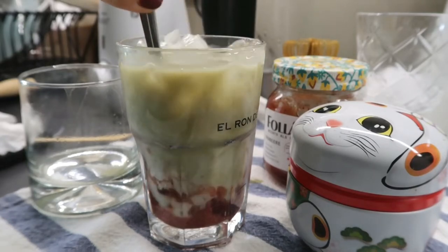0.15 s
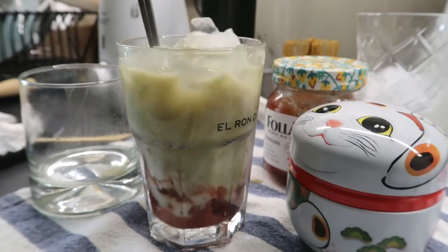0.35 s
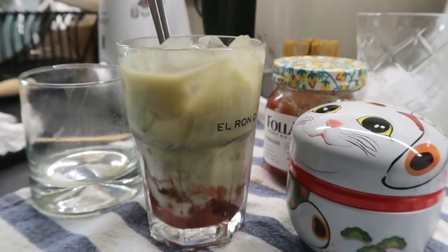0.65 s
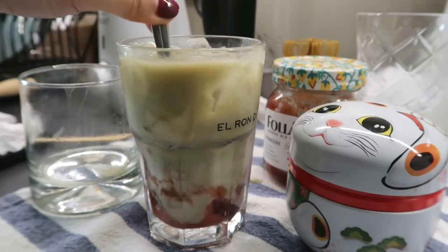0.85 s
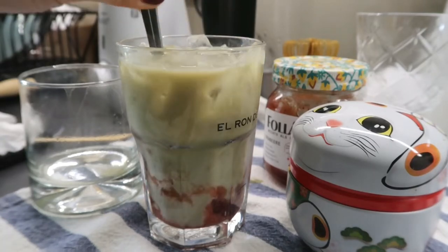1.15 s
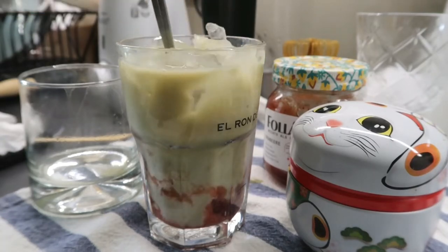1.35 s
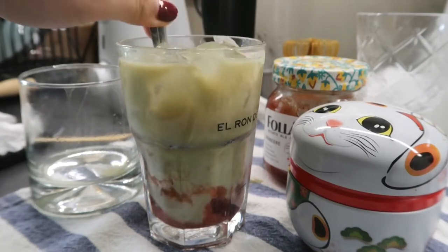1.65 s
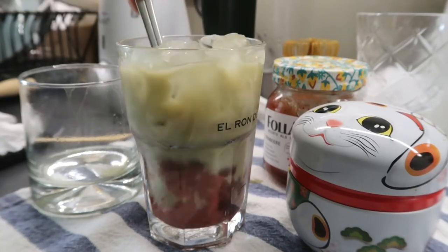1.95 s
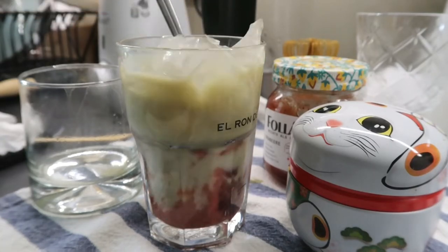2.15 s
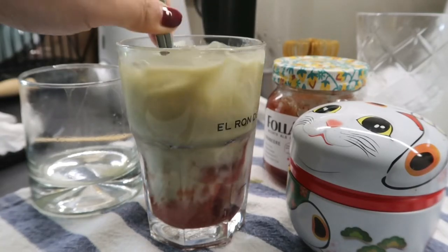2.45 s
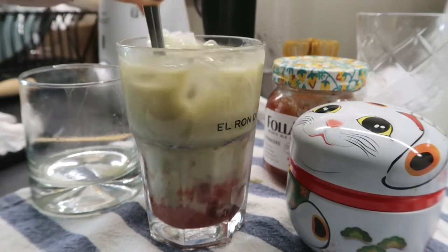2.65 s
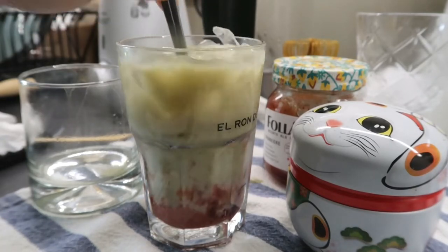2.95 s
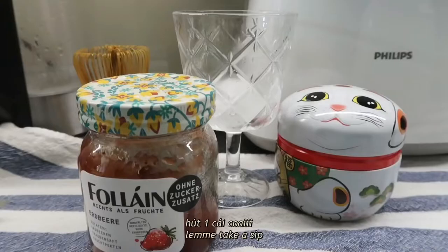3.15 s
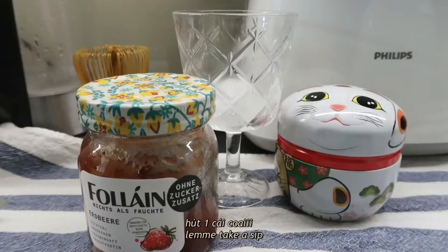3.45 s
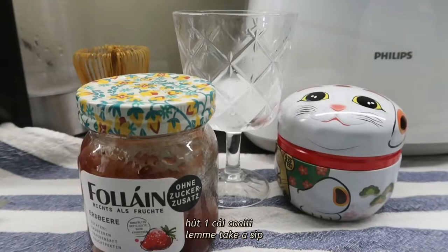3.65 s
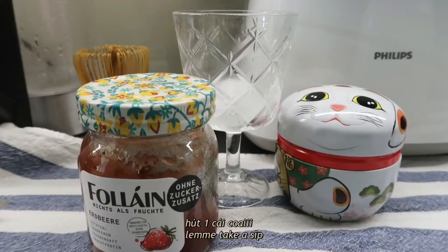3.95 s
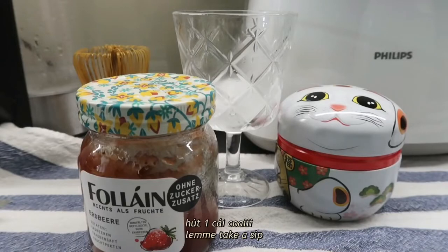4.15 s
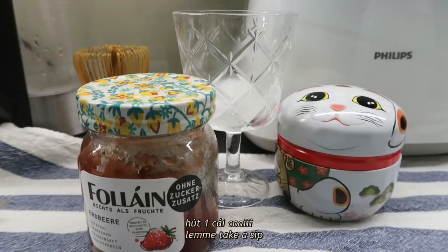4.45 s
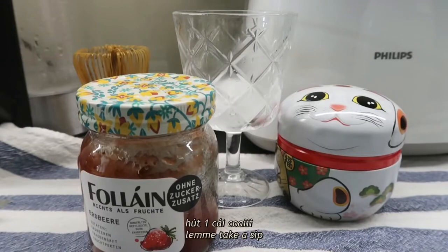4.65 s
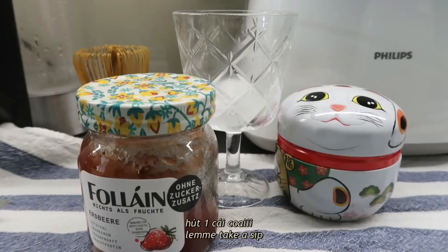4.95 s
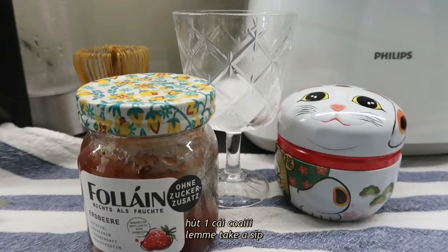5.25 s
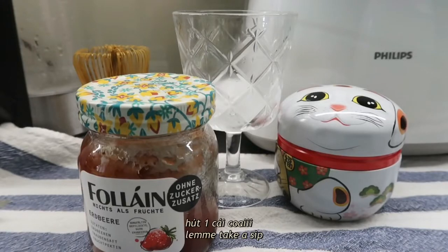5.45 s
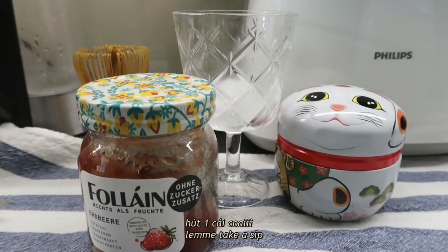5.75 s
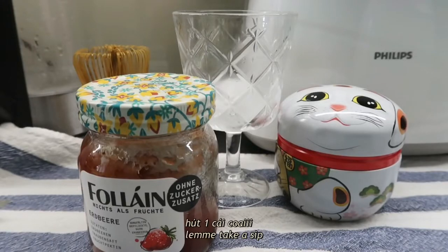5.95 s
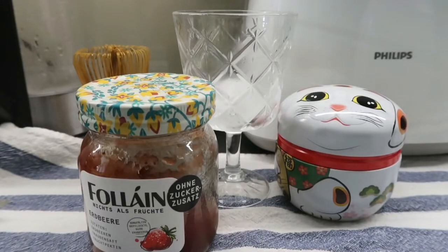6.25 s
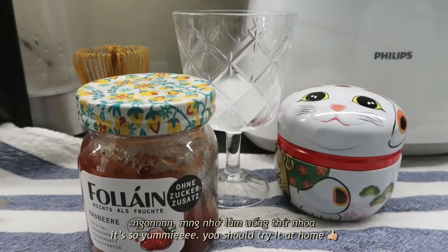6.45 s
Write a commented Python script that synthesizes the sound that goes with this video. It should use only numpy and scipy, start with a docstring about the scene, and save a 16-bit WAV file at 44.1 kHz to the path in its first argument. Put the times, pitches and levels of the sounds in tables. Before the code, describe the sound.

In a small, lightly echoing kitchen with low appliance rumble, ice and a metal straw tap a liquid-filled glass, damped and uneven, with faint slosh and bubbly blips. After an abrupt change the glass is tilted close to the microphone: a dense burst of hard, ringing ice clatter, then a lull, a brief bright hiss, a wet gulp, a single heavy clack and small trailing taps.

```python
"""Quiet kitchen: a metal straw stirs ice in a full tumbler of milky drink on a cloth; then, after a cut,
the glass is held and tilted for a sip. Knocks and fine rattle excite decaying glass and ice modes; ticks,
gurgles and other single tones are short rings; slosh, grinding, a hiss and a squelch are shaped noise.
Room tone and hum lie behind, diffuse echoes around. Two microphone ports; gain control ducks after loud knocks."""
import sys
import numpy as np
from scipy import signal
from scipy.io import wavfile
from scipy.ndimage import uniform_filter1d

SR = 44100
rng = np.random.default_rng(int(sys.argv[2]) if len(sys.argv) > 2 else 0)


def digitize_waveform(pressure):
    """Quantize a signal to 16-bit integers and store it at the path in sys.argv[1].

    Rows of a 2-D input are taken as channels; values are limited to [-1, 1].
    """
    field = np.atleast_2d(pressure).T
    bounded = np.clip(field, -1, 1)
    quanta = np.round(bounded * 32767).astype(np.int16)
    wavfile.write(sys.argv[1], SR, quanta)


N = 291501
TIME = np.arange(N) / SR
CUT_S, DRAINED_S = 3.02, 4.2   # cut from standing to held glass; drink leaves the wall
LEFT_RIGHT = np.array([[1], [-1]])


def amp(db):
    """Decibels to gain."""
    return 10 ** (np.asarray(db) / 20)


def rms_one(x):
    """Scale to rms 1."""
    return x / np.sqrt(np.mean(x ** 2) + 1e-20)


def in_time(rows):
    """Columns of a curve table, one value a sample."""
    s, *columns = np.transpose(rows)
    return [np.interp(TIME, s, c) for c in columns]


def at_hz(points, hz):
    """A spectrum read on a log-frequency axis."""
    points = np.array(points)
    return np.interp(np.log(hz), np.log(points[:, 0] + 1), points[:, 1])


def drift(rate_hz):
    """Slow chance, spread 1: low-passed noise at SR / 40, interpolated."""
    r = np.exp(-80 * np.pi * rate_hz / SR)
    noise = rng.standard_normal(N // 40 + 2002)
    slow = signal.lfilter([1], [1, -2 * r, r * r], noise)[2000:]
    return np.interp(np.arange(N) / 40, np.arange(len(slow)), rms_one(slow))


def banded_noise(spectrum, likeness, patchy_db, grain_db=0):
    """Half-octave bands of stereo noise, each with its own level, flicker, grain and likeness; rms 1."""
    out, together = 0, drift(8.0)
    edges_hz = 20 * 2 ** np.arange(0, 10, .5)
    white = rng.standard_normal((2, 2, N))
    for k, (low, high) in enumerate(zip(edges_hz, np.r_[edges_hz[1:], .4 * SR])):
        band = signal.butter(2, [low, high], "band", fs=SR, output="sos")
        mid, side = signal.sosfilt(band, white[k % 2])
        hz = np.sqrt(low * high)
        alike = np.clip(at_hz(likeness, hz), -1, 1)
        flicker_db = patchy_db * (together + drift(18)) + grain_db * drift(72.0)
        stereo = np.sqrt(1 + alike) * mid + np.sqrt(1 - alike) * side * LEFT_RIGHT
        out = out + amp(at_hz(spectrum, hz) + flicker_db) * stereo
    return rms_one(out)


def ring(clicks, hz, pitch, t60, lead, contact_s):
    """Clicks set one decaying mode ringing after a soft contact; pitch may slide, left leads in phase."""
    turn = np.exp(2j * np.pi * hz * np.cumsum(pitch) / SR)
    soft = np.exp(-1 / (max(contact_s, 1e-4) * SR))
    poles = np.convolve([1, -amp(-60 / (t60 * SR))], [1, -soft])
    swing = signal.lfilter([1 - soft], poles, clicks / turn + 1e-18) * turn
    return np.imag(swing * np.exp(.5j * lead * LEFT_RIGHT))


# phase lead of the left port: f/Hz, lead/rad (scaled down below 4 kHz)
LEAD_STANDING = [(0, -2), (3880, 0.28), (5680, 2), (6630, -1.2), (10400, 4), (12700, 1), (15400, -18)]
LEAD_HELD = [(0, -4), (4130, 0.26), (4480, -0.7), (5430, -1.5), (7320, 4.5), (7840, -2.5), (8700, 7),
             (11700, -2.5), (15400, -5)]


def port_lead(lead, hz):
    """Phase lead of the left port, rad; long waves reach both ports in step."""
    return at_hz(lead, hz) * min(hz / 4000, 1)


def blips(rows, attack_s):
    """Short single decaying rings with gliding pitch: rows (t/s, level/dB, f/Hz, glide factor, cycles)."""
    out, t = np.zeros((2, N + SR)), np.arange(SR // 10) / SR
    for s, peak_db, hz, rise, cycles in rows:
        t60 = max(cycles, 2) / hz
        glide_hz = hz * (1 + (rise - 1) * np.minimum(t / (.5 * t60), 1))
        envelope = amp(peak_db - 60 * t / t60) * np.minimum(t / attack_s, 1)
        lead = port_lead(LEAD_STANDING if s < CUT_S else LEAD_HELD, hz)
        phase = 2 * np.pi * np.cumsum(glide_hz) / SR + lead / 2 * LEFT_RIGHT
        out[:, int(s * SR):][:, :len(t)] += envelope * np.sin(phase)
    return out[:, :N] * amp(2.5 * drift(150.0))   # the rings flutter in level


# appliance rumble: f/Hz, width/Hz, level/dB re room tone
HUM = [(66.9, 12, -9), (89.6, 15, -4)]


def hum():
    """Noise twice through each low resonance: a wavering rumble, alike at both ports."""
    out = 0
    for hz, width_hz, level_db in HUM:
        r, x = np.exp(-np.pi * width_hz / SR), rng.standard_normal(N + SR)
        for _ in range(2):
            x = signal.lfilter([1, 0, -1], [1, -2 * r * np.cos(2 * np.pi * hz / SR), r * r], x)
        out = out + amp(level_db) * rms_one(x[SR:])
    return out


# room spectrum: f/Hz, relative level/dB
ROOM_TONE = [(12, -40), (20, -10.5), (76, -5.5), (102, -10.5), (124, -10), (225, -18.5), (295, -12.5),
             (495, -22), (552, -21), (1210, -25.5), (1470, -27.5), (1680, -27), (4480, -40), (12000, -49.5),
             (16000, -73)]
# room stereo: f/Hz, left-right likeness (-1 to 1)
ROOM_LIKENESS = [(20, 1), (110, 1), (170, 0.4), (300, 0.16), (600, 0.11), (1650, 0.3), (5000, 0.2),
                 (13000, 0.0985)]
ROOM_STANDING_DB, ROOM_HELD_DB = -50, -48


def room(held):
    """Steady broadband noise plus hum, slightly higher after the cut."""
    level = amp(np.where(held, ROOM_HELD_DB, ROOM_STANDING_DB))
    return level * (banded_noise(ROOM_TONE, ROOM_LIKENESS, patchy_db=-0.7) + hum())


KITCHEN_T60_S, KITCHEN_DB = 0.3, -10.5   # t60 of the dull part


def kitchen(x):
    """Diffuse echoes; the treble dies sooner, and mainly short waves differ between the ports."""
    t = np.arange(SR // 2) / SR
    noise = rng.standard_normal((2, len(t)))
    dull = signal.lfilter([.45], [1, -.55], noise)
    bright = noise - dull
    mid, side = dull * amp(-60 * t / KITCHEN_T60_S) + bright * amp(-110 * t / KITCHEN_T60_S)
    side = 0.48 * signal.lfilter(*signal.butter(1, 900., "high", fs=SR), side)
    echoes = np.array([mid + side, mid - side]) * np.minimum(t / 0.0065, 1)
    echoes = echoes / np.sqrt(np.sum(echoes ** 2) / 2)
    return amp(KITCHEN_DB) * signal.fftconvolve(x[None], echoes, axes=1)[:, :N]


# drink spectrum: f/Hz, relative level/dB
SLOSH = [(60, -39), (120, -30), (250, 7), (600, 1.5), (1200, -16.5), (2500, -8), (6000, -24)]
# wet-noise stereo: f/Hz, left-right likeness (-1 to 1)
SLOSH_LIKENESS = [(100, -0.31), (500, 0.051), (3000, 1), (7000, -0.68), (12000, 0.58)]
SLOSH_STIRRED_DB, SLOSH_STIRRED_FOLLOWS = -57, 0.98   # at usual motion; dB per dB of motion
SLOSH_HELD_DB, SLOSH_HELD_FOLLOWS = -61.5, 0.41


def slosh(swing_db, held):
    """Grainy noise: the drink swirls with the straw, then only sways in the hand."""
    stirred_db = SLOSH_STIRRED_DB + SLOSH_STIRRED_FOLLOWS * swing_db
    held_db = SLOSH_HELD_DB + SLOSH_HELD_FOLLOWS * swing_db
    noise = banded_noise(SLOSH, SLOSH_LIKENESS, patchy_db=2.0, grain_db=4.0)
    return amp(np.where(held, held_db, stirred_db)) * noise


# hiss spectrum: f/Hz, relative level/dB
HISS_COLOUR = [(710, -44), (1200, -23), (2120, -18), (3130, -14), (4190, -5), (6230, -16), (7330, -5),
               (13000, -14), (15700, -30)]
HISS_S, HISS_DB, HISS_ATTACK_S, HISS_HOLD_S, HISS_FADE_DB_PER_S = 5.029, -46, 0.0049, 0.041, 429.5
HISS_FROM_HZ, HISS_TO_HZ, HISS_SINK_S = 4750, 1740, 0.016


def hiss():
    """A short burst of bright noise during the sip, one broad resonance falling through it."""
    t = np.maximum(TIME - HISS_S, 0)
    fade_db = HISS_FADE_DB_PER_S * np.maximum(t - HISS_ATTACK_S - HISS_HOLD_S, 0)
    envelope = np.minimum(t / HISS_ATTACK_S, 1) ** 2 * amp(HISS_DB - fade_db)
    sink = np.exp(-np.maximum(t - HISS_ATTACK_S, 0) / HISS_SINK_S)
    centre_hz = HISS_TO_HZ + (HISS_FROM_HZ - HISS_TO_HZ) * sink
    falling = ring(rng.standard_normal(N), 1.0, centre_hz, t60=0.0084, lead=0, contact_s=.0001)
    noise = banded_noise(HISS_COLOUR, SLOSH_LIKENESS, patchy_db=2.0, grain_db=1.0)
    return envelope * (noise + amp(-3.5) * rms_one(falling[1]))


SQUELCH_S, SQUELCH_DB, SQUELCH_HOLD_S, SQUELCH_FADE_DB_PER_S = 5.63, -39, 0.026, 400
SQUELCH_HZ, SQUELCH_T60_S = 2000, 0.012


def squelch():
    """Drink gulps between the cubes as the glass tips back: lumpy noise in one broad resonance."""
    t = np.maximum(TIME - SQUELCH_S, 0)
    fade_db = SQUELCH_FADE_DB_PER_S * np.maximum(t - SQUELCH_HOLD_S, 0)
    envelope = np.minimum(t / 0.003, 1) * amp(SQUELCH_DB - fade_db + 3.0 * drift(90.0))
    noise = rng.standard_normal(N)
    return envelope * rms_one(ring(noise, SQUELCH_HZ, np.ones(N), SQUELCH_T60_S, lead=0, contact_s=.0001))


GURGLES_PER_S, GURGLE_DB, GURGLE_RISE, GURGLE_CYCLES = 30, -49.5, 1.22, 13.3   # dB at usual motion
GURGLE_LOW_HZ, GURGLE_HIGH_HZ = 450, 1710


def gurgles(swing_db):
    """Small rising blips at random in the stirred drink, louder when the ice moves hard."""
    when, size, tone = rng.random((int(GURGLES_PER_S * CUT_S), 3)).T
    s = when * CUT_S
    level_db = GURGLE_DB + 0.37 * swing_db[(s * SR).astype(int)] + 10.0 * (size - .5)
    hz = GURGLE_LOW_HZ * (GURGLE_HIGH_HZ / GURGLE_LOW_HZ) ** tone
    return blips([(*row, GURGLE_RISE, GURGLE_CYCLES) for row in zip(s, level_db, hz)], attack_s=0.0031)


# single short rings: t/s, level/dB, f/Hz, glide factor, cycles to die away
SHORT_RINGS = [(0.141, -39, 236, 0.95, 42), (0.3835, -28, 3300, 1.1, 40), (0.392, -30, 3700, 1.15, 50),
               (0.4269, -19.5, 1870, 3, 61), (0.447, -33, 2210, 1.02, 30), (0.4635, -22, 2240, 1.16, 39),
               (0.481, -35.5, 983, 0.4, 71), (.62, -30, 700, 1.17, 26), (0.629, -23.5, 318, 0.35, 5.2),
               (1.001, -46.5, 1060, 1.4, 71), (1.154, -47, 738, 1.1, 18), (1.191, -47, 240, 0.91, 16),
               (1.23, -31, 1320, 1.1, 37), (1.234, -23.5, 3020, 0.94, 21), (1.245, -37.5, 240, 1, 17),
               (1.35, -36, 797, 0.92, 54), (1.69, -40, 800, 0.94, 34), (1.965, -40.5, 980, 0.95, 74),
               (2.003, -35.5, 913, 0.9, 57), (2.072, -36, 247, 0.95, 23), (2.473, -31.5, 933, 1.03, 72),
               (2.489, -34, 490, 1.1, 14), (2.497, -30, 1500, 2.5, 72), (2.81, -38.5, 955, 1.13, 48),
               (2.865, -36, 970, 1, 83), (2.885, -37, 245.5, 1.06, 29), (3.17, -10.5, 1930, 0.92, 26),
               (3.2078, -7.5, 1800, 1.3, 34), (3.295, -11.5, 1560, 2.3, 57), (3.301, -20.5, 1040, 0.93, 19),
               (3.36, -17, 2880, 1.05, 71), (3.397, 1, 2170, 0.76, 11), (3.488, -6, 3040, 0.9, 36),
               (3.629, -14.5, 3240, 0.99, 32), (3.792, -25.5, 1390, 0.83, 20),
               (4.147, -28.5, 1320, 2.06, 6.4), (4.168, -52.5, 3950, 1.01, 270),
               (4.175, -46.5, 474, 1.1, 110), (5.503, -30, 1260, 1.08, 24), (5.632, -29.5, 1670, 1.4, 30),
               (5.671, -34, 1948, 0.98, 30), (5.7542, -13.5, 560, 1.2, 7.2)]


def short_rings():
    """Single short rings, gliding or steady: pockets, cubes, a low thump, a faint whistle."""
    return blips(SHORT_RINGS, attack_s=0.00097)


def cracks(t60):
    """Envelope of the burst of grinding that every knock shakes loose."""
    clicks = np.zeros(N)
    for s, peak_db, _, _, grit_db in KNOCKS:
        clicks[int(s * SR)] = amp(peak_db + grit_db)
    return signal.lfilter([1], [1, -amp(-60 / (t60 * SR))], clicks + 1e-18)


CRACKLE_PER_S, CRACKLE_CYCLES, CRACKLE_TILT_DB = 900, 12, 2.5   # tilt from lowest to highest pitch
CRACKLE_LOW_HZ, CRACKLE_HIGH_HZ = 1500, 12200


def crackle():
    """Wet cubes rub in uneven grains, each a few cycles at one of twelve pitches; rms 1."""
    born = rng.random(N) < CRACKLE_PER_S * amp(5.0 * drift(30.0)) / SR
    sizes = born * amp(4.34 * np.minimum(rng.exponential(1, N), 4)) * rng.choice([-1, 1], N)
    dealt, out = rng.integers(0, 12, N), 0
    for k, hz in enumerate(np.geomspace(CRACKLE_LOW_HZ, CRACKLE_HIGH_HZ, 12)):
        r, w = amp(-60 * hz / (CRACKLE_CYCLES * SR)), 2 * np.pi * hz / SR
        poles = [1, -2 * r * np.cos(w), r * r]
        grain = signal.lfilter([np.sin(w)], poles, sizes * (dealt == k) + 1e-18)
        lead = port_lead(LEAD_STANDING, hz)
        left = np.cos(lead) * grain + np.sin(lead) * np.gradient(grain) / np.sin(w)   # phase turned
        out = out + amp(CRACKLE_TILT_DB * k / 11) * np.array([left, grain])
    return rms_one(out)


# grinding spectrum: f/Hz, relative level/dB
CRUNCH = [(900, -18), (1800, -1), (3500, -1), (6000, -5.5), (8800, -9), (11000, -9.5), (13200, -22),
          (15000, -34)]
CRACKLE_STANDING_DB, CRACKLE_HELD_DB = -9, -7   # re grinding; stronger as cubes slide in the held glass


def crunch(motion_db, held):
    """Wet cubes grind: noise and crackle follow the motion and burst after each knock."""
    grinding = amp(motion_db + 0.57 * drift(94.0)) + cracks(t60=0.077)
    noise = banded_noise(CRUNCH, SLOSH_LIKENESS, patchy_db=3.0, grain_db=1.0)
    crackle_db = np.where(held, CRACKLE_HELD_DB, CRACKLE_STANDING_DB)
    return grinding * (amp(-3.0) * noise + amp(crackle_db) * crackle())


# straw and cubes ticking on each other: t/s, level/dB, f/Hz
TICKS = [(0.0527, -26, 9270), (0.1387, -33.5, 6400), (.2259, -34.5, 8300), (0.2617, -33, 6560),
         (.3044, -24, 11400), (.3711, -28.5, 7650), (0.432, -26.5, 8150), (.5003, -33.5, 6340),
         (0.5904, -36, 6400), (0.6044, -29, 7200), (0.6137, -25, 6100), (0.6643, -39, 6860),
         (1.0306, -45, 6600), (1.3468, -31, 6860), (1.452, -41, 6500), (1.5549, -42, 6330),
         (1.8884, -41, 6650), (2.0108, -33, 6160), (2.116, -26.5, 6860), (2.1879, -34, 6400),
         (2.3494, -38, 6320), (2.5192, -19.5, 6540), (2.7147, -36.5, 6160), (2.8195, -38, 7400),
         (2.8439, -27, 6400), (2.863, -25.5, 5080), (3.0116, -42, 6300), (3.023, -33, 5370),
         (3.1077, -32, 10500), (3.1492, -32, 7800), (3.1642, -21, 5560), (3.207, -19, 7550),
         (3.2515, -18, 8150), (3.2984, -16.5, 5340), (3.3468, -30, 8000), (3.3608, -36, 6650),
         (3.3757, -16.5, 6580), (3.3863, -13, 7900), (3.4076, -22, 7900), (3.4216, -16, 6600),
         (3.473, -24, 6500), (3.4865, -23, 6610), (3.5232, -16, 6580), (4.2807, -22.5, 5360),
         (5.669, -29.5, 4830), (5.7534, -5.5, 5300)]
# loosely held straw singing longer: t/s, level/dB
STRAW_RINGS = [(3.8332, -34), (3.85, -54), (3.867, -30), (3.912, -39.5), (3.932, -55), (3.955, -34.5),
               (5.614, -50), (5.6508, -45), (5.672, -41.5)]
STRAW_HZ, STRAW_CYCLES = 5540, 340
FAINT_TICKS, FAINT_TICK_DB, FAINT_TICK_HZ = 30, -50.5, 6500   # count, typical level and pitch
TICK_CYCLES, TICK_SPREAD = 31, 0.033   # three neighbouring pitches
AFTER_RING_DB, AFTER_RING_CYCLES = -9.5, 190


def ticks():
    """Bright ticks with thin after-rings, faint random ticks while stirred, and the straw's longer song."""
    when, size, tone = rng.random((FAINT_TICKS, 3)).T
    faint_db = FAINT_TICK_DB + 8.0 * (size - .5)
    faint = np.c_[when * CUT_S, faint_db, FAINT_TICK_HZ * (1 + .3 * (tone - .4))]
    rows = [(s, level_db - 6.7 * abs(k), hz * (1 + TICK_SPREAD * k), 1, TICK_CYCLES)
            for s, level_db, hz in [*TICKS, *faint] for k in (-1, 0, 1)]
    rows += [(s, level_db + AFTER_RING_DB, hz, 1, AFTER_RING_CYCLES) for s, level_db, hz in TICKS]
    rows += [(s, level_db, STRAW_HZ, 1, STRAW_CYCLES) for s, level_db in STRAW_RINGS]
    return blips(rows, attack_s=0.00046)


# ice on glass: t/s, level/dB, then thud, upper ring, grit, each dB re level
KNOCKS = [(0.0243, -49, -22, -14, 2), (0.059, -44, -21, 7, -9), (0.073, -30.5, -23, -5, -15),
          (0.1355, -35.5, -7, 9, -3), (0.229, -41.5, 3, 15, -13.5), (0.254, -44, -25, -2, -1),
          (0.26, -25, -11.5, 2.5, -10), (0.2887, -43, -24, 14.5, -8), (0.3234, -24.5, -47, -2, -24),
          (0.3484, -32, -16, -10, -13), (0.371, -27, -15, -9, -19), (.3945, -35, -0.5, -2, -24),
          (0.4137, -24.5, -13.5, -24, -21), (0.4301, -25, -13, -18, -6), (0.466, -24, -16, -7, -37),
          (0.4892, -37.5, -1.5, 3, -19), (.5462, -46, -19, 10, -20), (0.5726, -41, -26, 9, -8),
          (0.6132, -37.5, 5, 9.5, 6.5), (0.68, -38, -27, -13, -20), (0.83, -52, -16, -5, -16),
          (.8663, -50, -12, -3, -9), (0.909, -44.5, -6, 2, -12), (0.9696, -42.5, -6, -3, -5),
          (0.9838, -36.5, -15, 7, -25), (1.0873, -57, -12, -12, -21), (1.114, -43.5, 2.5, -25, -24),
          (1.1535, -39, -2, -32, -27), (1.1953, -57, -13, 0, -14), (1.219, -26, -33, -3, -30),
          (1.226, -23, -28, -24, -24), (1.234, -36.5, -7, 6, -10), (1.2427, -32, -12, 2, -17),
          (1.256, -28, -28, -10, -38), (1.28, -36, -15, -18, -32), (1.323, -37, -8, -18, -10),
          (1.3481, -23.5, -14, -19, -11.5), (1.3745, -32.5, -7.5, -19, -41), (1.432, -47, -4, -2, -18),
          (1.4516, -48, -16, 7, -8), (1.4992, -45.5, 2, 1, -16), (1.5877, -47.5, -9, 0, -6),
          (1.598, -55, -10, -2, -6), (1.6516, -50, -22, -7.5, -5), (1.669, -38, -9.5, -13, -13),
          (1.691, -38.5, -16.5, -11, -14), (1.727, -40, -5.5, -7, -15), (1.773, -44, -18, -13, -26),
          (1.8363, -54, -1, -10, -20), (1.8806, -42, -2, -20, -6), (1.9329, -40, -15, 1, -13),
          (1.9539, -38, -13, -16, -28), (1.9856, -38.5, -3, -3, -16), (1.9952, -25.5, -14, 0, -9.5),
          (2.0037, -32.5, -10, -9, -11), (2.012, -34, -10, -3, -3), (2.0706, -33.5, -3.5, -27, -8),
          (2.116, -23, -19.5, -11, -10.5), (2.128, -27, -12.5, -6, -10), (2.145, -35, -12, -15, -18),
          (2.1782, -39, -35, 4, -17), (2.2095, -24.5, -19.5, -4.5, -22), (2.2876, -48, -21, -15, -23),
          (2.3314, -23, -24, -7.5, -36), (2.369, -27, -20, -16, -19), (2.3972, -23, -19, -9, -17),
          (2.4222, -25, -28, -11.5, -21), (2.445, -26.5, -21, -3, -23), (2.4738, -25.5, -9.5, -9, -29),
          (2.484, -28.5, -15.5, -12, -19), (2.4956, -30, -1, -6, -27), (2.505, -32.5, -18, -4, -29),
          (2.5131, -25.5, -10, -11, -7.5), (2.555, -32, -11, -16, -25), (2.5879, -30, -15, -8, -22),
          (2.6072, -27, -11, -4, -30), (2.6783, -43.5, -31, 10, -21), (2.7, -32.5, -15, 0.5, -8),
          (2.727, -34.5, -19, -6, -11), (2.75, -34, -9.5, -25, -10), (2.844, -31.5, -25, 8, -4.5),
          (2.8641, -35, -3, -27, -4.5), (2.8936, -20.5, -22.5, -18, -24.5), (2.936, -33, -23, 2.5, -28),
          (2.9544, -25, -18, -15.5, -43), (3.0174, -16, -60.5, -19.5, -21), (3.037, -27, -36, -10, -18),
          (3.066, -15, -22.5, -11, -29), (3.1086, -37.5, -22, 15.5, -26), (3.152, -19.5, -38, -28, -8),
          (3.1701, -13.5, -24, 3, -16), (3.179, -12.5, -34.5, -19, -28), (3.1896, -11.5, -39, -15.5, -9.5),
          (3.208, -11.5, -50, -21, -15), (3.253, -17, -41, -14.5, -9), (3.269, -27, -28.5, 8, -20),
          (3.2884, -11.5, -33, -26.5, -14), (3.295, -21, -28, -16, -19.5), (3.2994, -10, -29, -20, -23.5),
          (3.3282, -27.5, -13, 6, -4), (3.3592, -24.5, -26, -3.5, -4), (3.3867, -16, -31, -16, -10.5),
          (3.397, -3.5, -38, -20.5, -41.5), (3.409, -33.5, -28, 6, -18), (3.422, -23, -38, 15.5, -16),
          (3.4415, -21, -13.5, -12, -28.5), (3.4587, -20, -14.5, -3, -34), (3.489, -11.5, -48, -13, -20),
          (3.5262, -10, -30, -22, -17), (3.535, -14, -16.5, -18.5, -29), (3.5398, -10, -30, -11.5, -37),
          (3.5703, -38, -28, -20, -17), (3.616, -31, -21, -11, -16), (3.63, -16, -23, -21, -29),
          (3.6584, -20, -29, -27, -20), (3.6699, -18, -26, -29, -23.5), (3.678, -22, -29, -24, -22),
          (3.693, -26.5, -19, -27, -20), (3.712, -45, -28, -5, -2), (3.73, -24, -21, -2, -22),
          (3.764, -17.5, -50, -32, -34), (3.7773, -20, -32, -0.5, -37), (3.8047, -20, -28, -29, -42),
          (3.8673, -30, -17, -20, -19), (3.9227, -36, -22, -14, -14), (3.9557, -23.5, -45, -23, -18),
          (4.0232, -47.5, -17, 2, -9), (4.2799, -21, -18, -12.5, -18), (4.3224, -29, -19, -5, -14),
          (4.34, -34.5, -11, -13.5, -18), (4.352, -32, -2, -11, -31), (4.359, -48, -2, -9, -4),
          (5.168, -60.5, -10, 5, -15), (5.376, -59.5, -9.5, 13, -5), (5.566, -49, -13, -17.5, -4.5),
          (5.593, -52, 4, -8.5, 0), (5.6154, -41.5, -7, -4, -8), (5.631, -40.5, -24.5, -3.5, -10.5),
          (5.649, -28, -27.5, -15, -23.5), (5.668, -32, -11, -15.5, -16), (5.689, -38, -22.5, -16.5, -28),
          (5.713, -45, -25.5, -12, -24.5), (5.753, 2.5, -35, -3, -18.5), (5.7939, -14, -38.5, -2, -16.5),
          (5.8, -19, -31.5, -4.5, -20), (5.85, -34, -25, 8, -24.5), (5.918, -41, -25, 21, -30.5),
          (6.1345, -48.5, -6.5, -9, -15), (6.2086, -48, -8, -23, -20), (6.2493, -54.5, -6.5, -12, -17),
          (6.283, -37.5, -13, -26, -25), (6.3093, -33, -14, -17, -35), (6.312, -31, -14, -18, -28),
          (6.338, -43, -14, -20, -27), (6.352, -49, -12, -20, -25), (6.3664, -51.5, -8, -14.5, -19)]
# where thud, main, upper and treble ring lie: f/Hz
COLOUR_HZ = [500, 2400, 4400, 6500]
# how the wall faces the ports: f/Hz, left-right/dB
GLASS_BALANCE = [(300, 0.5), (1000, 0), (2600, -0.6), (4700, -1.4), (12000, -1.9)]
# dry knock of a cube: f/Hz, relative level/dB
ICE = [(300, -25), (1000, -15.5), (2200, -16), (4000, -16.5), (7000, -7), (11000, -22), (15000, -31)]
RATTLE_PER_S, RATTLE_CLUMP_DB = 300, 3.0
TREBLE_FOLLOWS_GRIT, TREBLE_FOLLOWS_PEAK = 0.32, 0.32   # gritty or hard knocks ring brighter


def ice_in_glass(span, modes, pitch, lead, rattle_db, ring_db, knock_db, contact_s, pan_db, wander,
                 flutter_db, rattle_bright_db, pan_spread_db, sustain, spot_db, treble_db):
    """Knocks and a fine random rattle strike the glass modes and the short dry modes of the cubes."""
    rows = np.array([c for c in KNOCKS if span.start <= c[0] * SR < span.stop])
    at, size = (rows[:, 0] * SR).astype(int) - span.start, span.stop - span.start
    treble = TREBLE_FOLLOWS_GRIT * rows[:, 4] + TREBLE_FOLLOWS_PEAK * rows[:, 1] + treble_db
    colour = np.c_[rows[:, 2], 0 * at, rows[:, 3], treble]
    sides = amp((pan_db + pan_spread_db * rng.standard_normal(len(at))) / 2 * LEFT_RIGHT)
    clumps = amp(RATTLE_CLUMP_DB * drift(25.0))[span]
    small = np.flatnonzero(rng.random(size) < RATTLE_PER_S * clumps / SR)
    strength_db = 1.9 * np.minimum(rng.exponential(1, len(small)), 4) + rattle_db[span][small]
    glass = [(hz, level_db + ring_db, sustain * t60, spot_db) for hz, level_db, t60 in modes]
    cubes = [(hz, at_hz(ICE, hz) + knock_db, 22.0 / hz + 0.0002, 4.0)
             for hz in np.geomspace(300, 14000, 16)]
    out = np.zeros((2, size))
    for hz, level_db, t60, spread_db in glass + cubes:
        tint_db = np.array([at_hz(np.c_[COLOUR_HZ, c], hz) for c in colour])
        clicks = np.zeros((2, size))
        # every contact lands on another spot: own strength per mode, own sign per rattle contact
        bright_db = rattle_bright_db * np.log2(hz / COLOUR_HZ[1])
        small_db = strength_db - 12.0 + bright_db + rng.normal(0, 5.5, len(small))
        clicks[:, small] = amp(small_db + pan_db / 2 * LEFT_RIGHT) * rng.choice([-1, 1], len(small))
        spots_db = spread_db * rng.standard_normal(len(at))
        blows = amp(rows[:, 1] + tint_db - np.median(tint_db) + spots_db)
        np.add.at(clicks, (slice(None), at), sides * blows * rng.choice([-1, 1]))
        # floating cubes touch the wall and break the ring up
        damping_db = (flutter_db * drift(160.0))[span]
        gain = amp(level_db + damping_db + at_hz(GLASS_BALANCE, hz) / 2 * LEFT_RIGHT)
        bent = (pitch * (1 + wander * drift(13.6)))[span]
        out += gain * ring(clicks, hz, bent, t60, port_lead(lead, hz), contact_s)
    return out


# glass modes, t60 before sustain: f/Hz, level/dB, t60/s; full and damped by the drink
STANDING = [(236.6, -9, 0.11), (384, -16.5, 0.15), (773.5, -11, 0.083), (958, -10, 0.13), (1710, -5, 0.029),
            (2152, 0, 0.044), (2254, -3.5, 0.071), (2372, -7, 0.08), (3050, -6.5, .015), (3700, -3, 0.027),
            (3827, -4.5, 0.075), (4047, -11.5, 0.03), (5300, -33, 0.0134), (6400, -10, 0.014)]
# in the hand, f at full tilt: f/Hz, level/dB, t60/s
HELD = [(1002, -23.5, 0.076), (1960, -13, 0.022), (2415, -8, 0.026), (2634, 5.5, 0.062),
        (2824, -21.5, 0.021), (3370, -18.5, 0.029), (4763, -6, 0.071), (5410, -13, 0.03),
        (6650, -16, 0.033), (7846, -14, 0.029), (8150, -21.5, 0.028), (10170, -22.5, 0.027),
        (11920, -23, 0.03)]
# thin partners of the two main modes, free once drained: f/Hz, level/dB, t60/s
LINGERING = [(2640, -28, .3), (4766, -23, 0.41)]
RATTLE_DB, RATTLE_FOLLOWS = -37, 1.46   # drained, at usual motion; dB per dB of motion
STANDING_RATTLE_DB, HELD_RATTLE_DB = -2, -1.5   # re drained: quieter where listed knocks are dense
TILT_START_S, TILT_END_S, TILT_FLAT = 4.3, 4.4, 0.021
DRAINED_ROUGHNESS = 0.11   # share of waver and flutter left


def tumbler(swing_db):
    """Glass standing, held, then drained: the held ring starts flat and rises as drink leaves the wall."""
    cut, drain = int(CUT_S * SR), int(DRAINED_S * SR)
    rattle_db = RATTLE_DB + RATTLE_FOLLOWS * swing_db
    full = np.clip((TILT_END_S - TIME) / (TILT_END_S - TILT_START_S), 0, 1)
    tilt, wet = 1 - TILT_FLAT * full, DRAINED_ROUGHNESS + (1 - DRAINED_ROUGHNESS) * full
    wobble = 1 + .016 * drift(33.0)   # cubes touching the wall pull its pitch about
    standing = ice_in_glass(
        slice(0, cut), STANDING, wobble, LEAD_STANDING, rattle_db + STANDING_RATTLE_DB,
        ring_db=-9.5, knock_db=-10.0, contact_s=0.00036, pan_db=-0.3, wander=0.021, flutter_db=3.0,
        rattle_bright_db=1.5, pan_spread_db=0.5, sustain=0.96, spot_db=2.5, treble_db=0.3)
    held = ice_in_glass(
        slice(cut, drain), HELD, tilt * wobble ** (0.59 * wet), LEAD_HELD, rattle_db + HELD_RATTLE_DB,
        ring_db=-6.0, knock_db=-16.0, contact_s=0.00024, pan_db=-1.4, wander=0.0058 * wet,
        flutter_db=2.6 * wet, rattle_bright_db=4.0, pan_spread_db=2.0, sustain=0.82, spot_db=1.1,
        treble_db=2.5)
    drained = ice_in_glass(
        slice(drain, N), HELD + LINGERING, tilt * wobble ** (0.45 * wet), LEAD_HELD, rattle_db,
        ring_db=-6.0, knock_db=-19.0, contact_s=0.00011, pan_db=1.4, wander=0.004 * wet,
        flutter_db=3.1 * wet, rattle_bright_db=4.0, pan_spread_db=0.6, sustain=0.85, spot_db=1.46,
        treble_db=-4.5)
    return np.c_[standing, held, drained]


# how hard the ice moves, as level of its grinding: t/s, level/dB
MOTION = [(0, -60), (.12, -51.5), (.19, -52.5), (.37, -44), (.49, -48), (.66, -55), (.93, -65.5),
          (1.3, -53.5), (1.47, -59.5), (1.72, -59.5), (1.93, -53.5), (2.07, -45.5), (2.4, -51.5),
          (2.6, -46), (2.98, -50.5), (3.1, -43.5), (3.2, -31.5), (3.33, -43.5), (3.4, -34), (3.58, -42),
          (3.69, -56), (3.83, -43), (4.02, -65.5), (4.82, -72), (5.65, -71.5), (5.77, -52.5), (6.0, -61),
          (6.61, -66.5)]
USUAL_MOTION_DB = -50
TICK_ECHO_DB = -0.5   # level of the ticks sent into the echoes


def scene():
    """Glass, ice and drink close by, the kitchen around."""
    motion_db, = in_time(MOTION)
    swing_db, held = motion_db - USUAL_MOTION_DB, TIME > CUT_S
    background = room(held)
    wet_noise = slosh(swing_db, held) + hiss() + crunch(motion_db, held)
    bright = ticks()
    glass = tumbler(swing_db) + short_rings() + gurgles(swing_db) + squelch()
    echoes = kitchen((glass + amp(TICK_ECHO_DB) * bright).mean(0))
    return background + echoes + wet_noise + bright + glass


RELEASE_DB_PER_S, CUTOFF_HZ = 7.5, 15900


def record(dry):
    """Gain control ducks after loud knocks and recovers slowly; peaks clip; the top is cut."""
    level_db = 10 * np.log10(uniform_filter1d(np.mean(dry ** 2, 0), 256) + 1e-12)
    over_db = np.maximum(level_db + 23.0, 0) * 0.41
    release_db = RELEASE_DB_PER_S * TIME
    held_db = np.maximum.accumulate(over_db + release_db) - release_db
    r = np.exp(-1 / (0.018 * SR))
    duck_db = signal.lfilter([1 - r], [1, -r], held_db)
    clipped = np.clip(dry * amp(-duck_db), -1, 1)
    return signal.sosfilt(signal.cheby2(12, 70, CUTOFF_HZ, fs=SR, output="sos"), clipped)


dry = scene()
out = record(dry)
digitize_waveform(out)
```